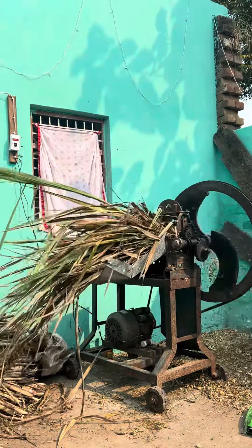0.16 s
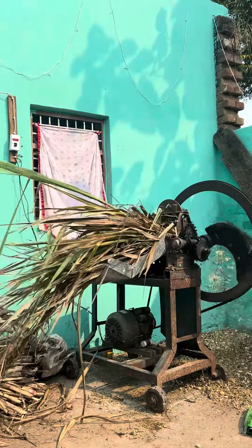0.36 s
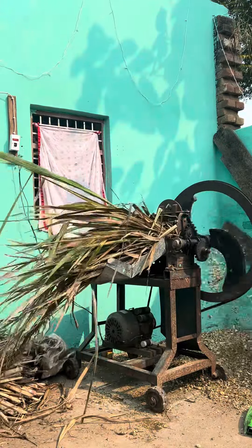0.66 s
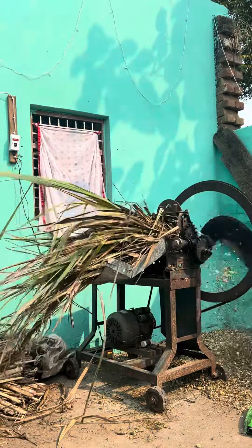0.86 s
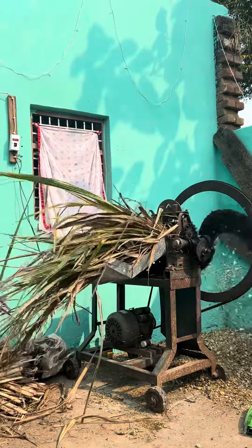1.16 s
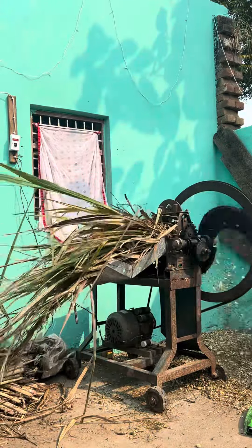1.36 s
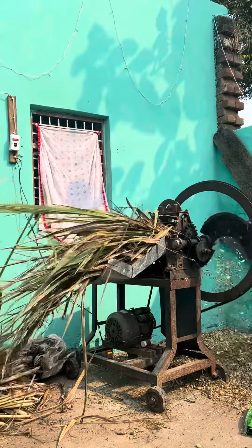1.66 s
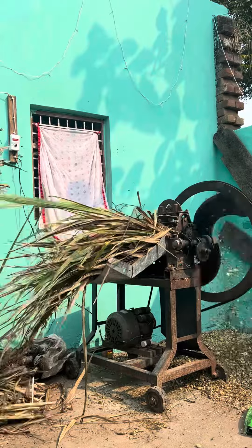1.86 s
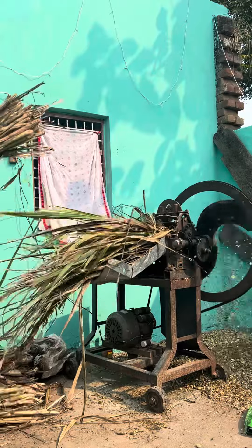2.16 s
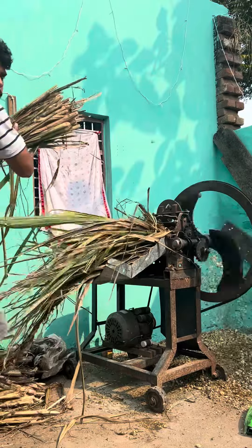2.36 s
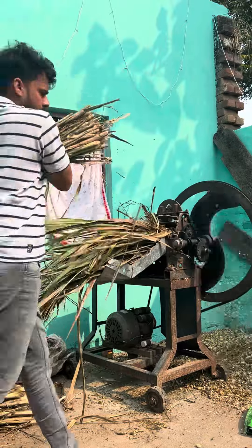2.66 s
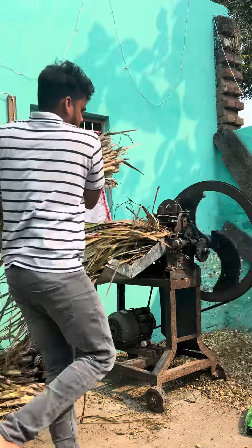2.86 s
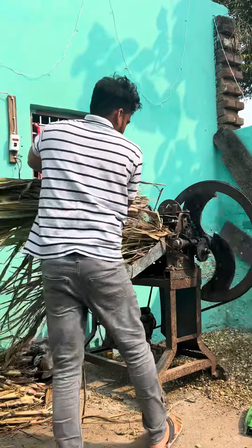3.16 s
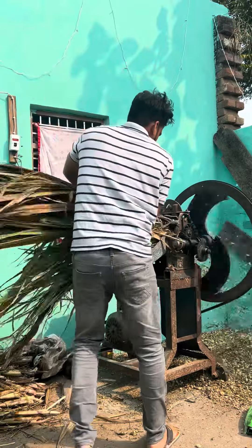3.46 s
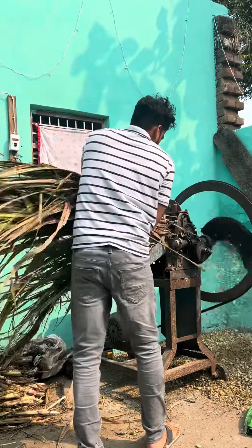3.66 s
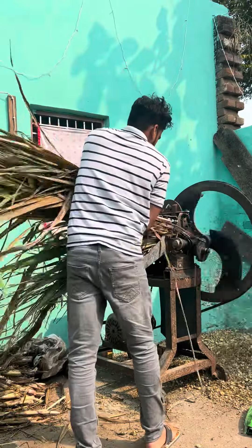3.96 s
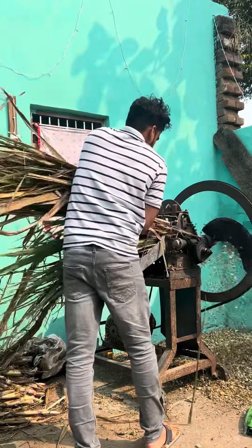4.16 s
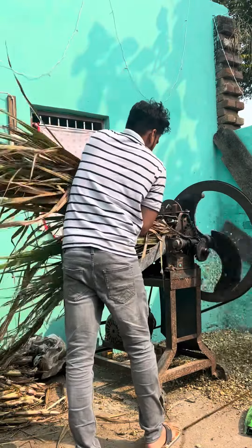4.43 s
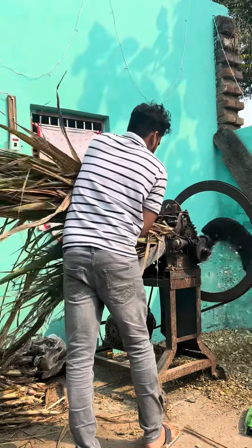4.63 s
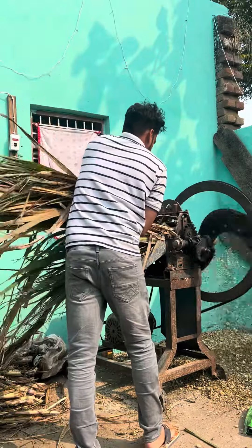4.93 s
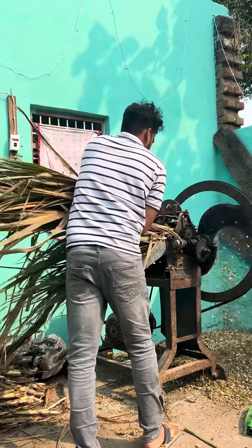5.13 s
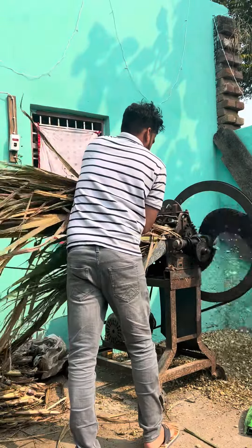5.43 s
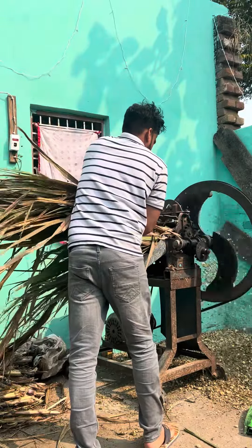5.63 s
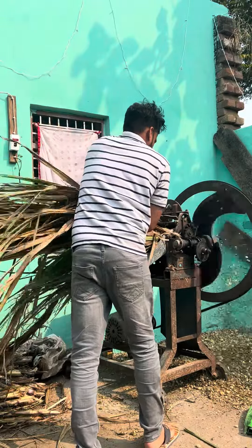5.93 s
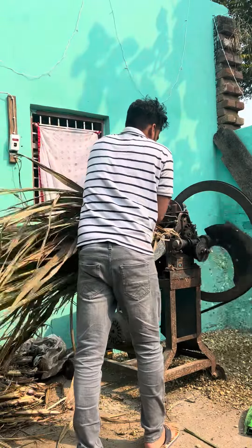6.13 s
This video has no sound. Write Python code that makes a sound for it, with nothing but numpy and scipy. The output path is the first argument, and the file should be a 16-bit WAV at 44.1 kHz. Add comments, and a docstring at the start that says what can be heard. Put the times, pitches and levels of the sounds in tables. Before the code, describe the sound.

Rapid rhythmic crunching of green stalks under two spinning flywheel blades, each cut a rasp and hollow knock, above motor hum and gear rattle.

```python
"""Crunching chops, a little over six a second, with ringing steel over a humming, rattling drive.
An electric chaff cutter cuts green stalks in a yard, in front of a house wall.
Two flywheel blades take turns: each shears leaves, crunches the bundle and knocks on hollow stalks.
Cuts are shaped bursts of random clicks, filtered; steel is resonances, motor and drive are wavering sines."""
import sys
import numpy as np
from scipy import signal
from scipy.fft import rfft, irfft
from scipy.io import wavfile
from scipy.ndimage import uniform_filter1d

SR = 44100
rng = np.random.default_rng(int(sys.argv[2]) if len(sys.argv) > 2 else 0)


def to_wav(s):
    """Save 16-bit WAV."""
    ch = np.atleast_2d(s).T  # columns
    pcm = np.round(np.clip(ch, -1, 1) * 32767)  # PCM
    wavfile.write(sys.argv[1], SR, pcm.astype(np.int16))


N = 277389
TIME = np.arange(N) / SR

# fullness of the leafy bundle in the mouth: t/s, relative level/dB
BUNDLE_FULLNESS = [(0, -2), (1.1, -0.5), (1.5, -2.5), (3.2, -4.0), (4.3, -5.5), (5.0, -6.0), (6.3, -7.5)]
HOLD_S_PER_DB = .0014  # a thinner bundle lets the blade out sooner


def crackle(full_db=-17.0, db_per_bundle_db=0.31, exit_db=-21.5):
    """The bundle packs and crunches against the plate; the last fibres tear as the blade leaves."""
    cuts = cut_times()
    bundle_db = at(BUNDLE_FULLNESS, cuts)
    force = strokes(cuts, full_db + db_per_bundle_db * bundle_db,
                    start_s=-.016, attack_s=.035, hold_s=.037, release_s=.033)
    exits = cuts + HOLD_S_PER_DB * bundle_db / 2
    tear = strokes(exits, exit_db + bundle_db / 2,
                   start_s=.027, attack_s=.016, hold_s=.0049, release_s=.024)
    return np.hypot(force, tear) * fibres(spread_db=2.5, clumps_db=1.04)


def thud(level_db=-17.4, jolt_db=1.42, stalk_hz=790, spread_octaves=.2):
    """Hollow stalks give way against the shear plate with a knock and shake the housing."""
    # hard stalk met by the blades: t/s, relative level/dB
    hard_stalk = [(0, -.5), (.85, -.5), (1.15, -2), (1.95, .5), (2.73, 0), (3.5, -3), (4.3, -4),
                  (4.45, -.7), (5.08, -2.5), (5.4, -4), (6.3, -5)]
    # direct thud spectrum: f/Hz, relative density/dB per Hz
    thud_spectrum = [(60, -17.5), (200, -22), (380, -19.5), (500, -3.5), (650, -6.5), (760, -1.5),
                     (940, -5.5), (1150, -9), (1500, -15), (2400, -23.5), (6000, -41.5)]
    # modes of cutting mouth and housing: f/Hz, width/Hz, relative level/dB
    housing_modes = [(555, 125, -7), (696, 15, -4.5), (753, 29, 6), (867, 44, -6.5), (1018, 56, 5),
                     (1406, 14, 4.5), (1580, 81, -7), (1790, 96, -5)]
    cuts = cut_times()
    force = strokes(cuts, level_db + at(hard_stalk, cuts),
                    start_s=-.0057, attack_s=.041, hold_s=.013, release_s=.035)
    force = force * amp(jolt_db * drift(rate_hz=40))  # jerks from stalk to stalk
    blows = clicks(per_s=2500, spread_db=2)
    local_power = abs(uniform_filter1d(blows ** 2, size=450))
    blows = force * blows / np.sqrt(local_power + 1e-2)  # blade shares its force among them

    housing = sum(amp(db) * resonate(blows, hz, width_hz) for hz, width_hz, db in housing_modes)
    # two stalk pitches a cut
    pitches_hz = stalk_hz * 2 ** (spread_octaves * rng.standard_normal((len(cuts), 2)))
    pitch_times = cuts[:, None] + [-.004, .008]
    pitch_hz = np.interp(TIME, pitch_times.ravel(), pitches_hz.ravel())
    stalks = resonate(blows, pitch_hz, width_hz=150)
    stalks = resonate(stalks, pitch_hz, width_hz=150)
    return amp(-4.5) * colour(blows, thud_spectrum) + amp(10) * housing + amp(14) * stalks


def leaves(full_db=-19.0, lead_s=.0019):
    """The blade shears the outer leaves first: a sudden, thin rasp."""
    cuts = cut_times()
    # one blade meets the leaves early, the other as much late
    touches = cuts - lead_s * (-1) ** np.arange(len(cuts))
    force = strokes(touches, full_db + at(BUNDLE_FULLNESS, cuts),
                    start_s=-.049, attack_s=.0135, hold_s=.021, release_s=.022)
    return force * fibres(spread_db=1.5, clumps_db=0.5)


def snaps():
    """Stalks crack in the feed rollers, a few ms each; flying chaff patters on the frame."""
    # single stalks snapping: t/s, relative level/dB
    snap_events = [(1.219, -27), (2.659, -29), (2.957, -28), (3.563, -35), (4.182, -28), (4.969, -32),
                   (5.884, -29)]
    burst = sum(stroke(s, db + 2.5, attack_s=.0005, hold_s=.0005, release_s=.005)
                for s, db in snap_events)
    patter = clicks(per_s=90, spread_db=4)
    return burst * rng.standard_normal(N) + amp(-44.5) * patter


def steel_ring(cutting):
    """Cutting noise excites decaying modes of the blades and flywheel."""
    # blade and flywheel modes: f/Hz, t60/s, relative level/dB
    steel_modes = [(1068, 0.23, -8), (1181, 0.39, -6), (2000, .2, -16), (2520, 0.22, -41),
                   (2775, 0.13, -18), (3210, 0.04, -16), (4680, 0.025, -9.5), (5940, .06, -19)]
    # how freely the steel rings: t/s, relative level/dB
    ring_level = [(0, -30.5), (1.3, -38.5), (2.5, -35), (3.2, -40), (4.5, -34), (6.3, -41)]
    ring = 0
    for hz, t60_s, db in steel_modes:
        width_hz = np.log(1000) / np.pi / t60_s
        ring = ring + amp(db) * unit(resonate(cutting, hz, width_hz))
    return amp(at(ring_level)) * unit(ring)


def blade_graze(gain_db=6.5):
    """One blade grazes the shear plate once a turn and sings as a wavering sine."""
    # how hard it grazes: t/s, relative level/dB
    graze_level = [(0, -31.5), (.85, -30), (1.8, -31.5), (2.45, -33), (2.75, -45), (6.3, -41)]
    turns = cut_times()[1::2]
    singing = strokes(turns, gain_db + at(graze_level, turns),
                      start_s=.023, attack_s=.04, hold_s=.035, release_s=.078)
    return singing * tone(hz=1072, waver_hz=5.02)


def gear_rattle(full_db=-33.8, db_per_bundle_db=0.4):
    """Feed gear teeth strike in random clicks, louder under a full bundle."""
    # rattle spectrum: f/Hz, relative density/dB per Hz
    gear_spectrum = [(20, -29), (42, -20), (80, -9.5), (130, -3), (180, 2.5), (290, -1), (400, 0.5),
                     (600, -5.5), (1450, -5.5), (1750, -22.5), (2050, -7), (2400, -21), (5000, -20),
                     (15000, -27.5)]
    teeth = clicks(per_s=1800, spread_db=2.0) * amp(2 * drift(rate_hz=125))
    level_db = full_db + db_per_bundle_db * at(BUNDLE_FULLNESS)
    return amp(level_db) * unit(colour(teeth, gear_spectrum))


def gear_whine():
    """Feed gears mesh in a whine of wavering pitch and strength."""
    # whine: t/s, level/dB
    whine_level = [(0, -46), (1.3, -39.5), (2.4, -39), (3.5, -54), (4.4, -47), (6.3, -44)]
    mesh = amp(3 * drift(rate_hz=35)) * tone(hz=1178, waver_hz=8)
    return amp(at(whine_level)) * mesh


def motor_hum():
    """Motor and drive hum as a few wavering sines that slowly fade together."""
    # hum partials: f/Hz, relative level/dB, rms waver/Hz
    hum_partials = [(99.8, -44, 0.35), (191, -45, 1.4), (217.6, -50, 0.85), (245.8, -47.5, 2.36),
                    (352.3, -49.5, 1.62)]
    # fade of the hum: t/s, relative level/dB
    hum_fade = [(0, 1.5), (1.2, 0.5), (2.6, 0), (3.6, -1), (4.7, -3.5), (6.3, -5.5)]
    hum = sum(amp(db + 1.6 * drift(rate_hz=16)) * tone(hz, waver_hz)
              for hz, db, waver_hz in hum_partials)
    return amp(at(hum_fade)) * hum


def belt_moan():
    """The belt moans on one wavering pitch."""
    # moan: t/s, relative level/dB
    belt_level = [(0, -34.5), (.2, -32.5), (.5, -36.5), (1.7, -43.5), (4, -45.5), (5.8, -50), (6.25, -39)]
    return amp(at(belt_level) - 4) * tone(hz=164.3, waver_hz=3.34)


def frame_drone(throb_db=4.5, throb_lead_s=0.075):
    """The frame drones on one low pitch, throbbing once per blade pass."""
    # drone: t/s, relative level/dB
    drone_level = [(0, -45.5), (2.15, -48), (2.4, -43.5), (4.1, -39.5), (5.1, -50), (6.3, -46.5)]
    cuts = cut_times()
    passes = np.interp(TIME + throb_lead_s, cuts, np.arange(len(cuts)))
    throb = amp(throb_db * np.cos(2 * np.pi * passes))
    return amp(at(drone_level) - 3.0) * unit(throb * tone(hz=63.5, waver_hz=3.4))


def yard(x, direct_db=-3.0, walls_db=-9, tail_db=-13, t60_s=0.28, count=4):
    """Ground and wall answer at once, a short tail follows; the turning wheel keeps changing the paths."""
    t = TIME[:SR // 3]
    out = amp(direct_db) * x
    shares = np.array([drift(rate_hz=11.1) for _ in range(count)])
    for share in shares / np.linalg.norm(shares, axis=0):
        sign, chance = rng.choice([-1, 1], len(t)), rng.random(len(t))
        early = sign * (chance < 1200 / SR) * (t > .002) * amp(-60 * t / 0.03)
        late = sign * (chance > 1 - 4000 / SR) * (t > .014) * amp(-60 * t / t60_s)
        echo = amp(walls_db) * early / np.linalg.norm(early)
        echo = echo + amp(tail_db) * late / np.linalg.norm(late)
        out = out + signal.oaconvolve(x * share, echo)[:N]
    return out


def ports(x, direct_share=0.56, size=256):
    """Two close microphone ports hear a phase offset; scattered sound blurs their difference."""
    # interport phase: f/Hz, left lead/rad
    port_phase = [(90, 0), (330, -.45), (600, -1), (1200, -.7), (1600, 0), (2650, 1.9), (3050, .9),
                  (4600, 1), (5500, 3.14), (7400, 6.25), (9900, 9.4), (10950, 10.2), (12300, 12.55),
                  (15000, 15.7)]
    # interport balance: f/Hz, left minus right/dB
    port_balance = [(80, 0), (450, 3), (850, 3.6), (1600, .3), (2700, -2.2), (3900, -2.4), (5000, 1.4),
                    (5500, 0)]
    frames = signal.stft(x, nperseg=size)[2]
    random_phase = np.exp(2j * np.pi * rng.random(frames.shape))
    scatter = signal.istft(frames * random_phase, nperseg=size)[1][:N]
    scatter = np.std(x) * unit(scatter)
    blurred = direct_share * x + np.sqrt(1 - direct_share ** 2) * scatter

    hz = np.fft.rfftfreq(N, 1 / SR)
    half_phase = read(port_phase, hz) / 2
    mid = np.cos(half_phase) * rfft(x)
    side = 1j * np.sin(half_phase) * rfft(blurred)
    lean = amp(read(port_balance, hz) / 2)
    return irfft(np.array([(mid + side) * lean, (mid - side) / lean]), N)


def cut_times(count=41, first_s=.0355, first_gap_s=.15995, gap_shrink_s=.000145):
    """Mid stroke of every blade pass; the flywheel gathers speed, so each gap is a little shorter."""
    k = np.arange(count)
    return first_s + k * first_gap_s - gap_shrink_s * k * (k - 1) / 2


def strokes(times, levels_db, start_s, attack_s, hold_s, release_s, uneven_db=0.84, uneven_s=.0016):
    """One stroke per blade pass, randomly uneven in level and timing, shorter in a thin bundle."""
    holds_s = np.maximum(hold_s + HOLD_S_PER_DB * at(BUNDLE_FULLNESS, times), 0)
    chance = rng.standard_normal((len(times), 3))
    out = np.zeros(N)
    for s, db, held_s, (hard, shift, longer) in zip(times, levels_db, holds_s, chance):
        out += stroke(s + start_s + uneven_s * shift, db + uneven_db * hard,
                      attack_s, held_s + uneven_s * longer, release_s)
    return out


def stroke(s, db, attack_s, hold_s, release_s, flank_db=19.5, flank_bend=1.49, sag_db_per_s=37):
    """Gain that swells up to time s, sags while the blade gets through and dies away."""
    out = np.zeros(N)
    near = slice(max(round((s - .15) * SR), 0), round((s + .2) * SR))
    after_s = TIME[near] - s
    # distance outside the hold, in attacks or releases
    away = np.maximum(-after_s / attack_s, 0) + np.maximum((after_s - hold_s) / release_s, 0)
    sag_db = sag_db_per_s * np.clip(after_s, 0, max(hold_s, 0))
    out[near] = amp(db - sag_db - flank_db * away ** flank_bend)
    return out


def fibres(spread_db, clumps_db):
    """Countless small breaks, in clumps."""
    return unit(clicks(per_s=7000, spread_db=spread_db) * amp(clumps_db * drift(rate_hz=180)))


def mottle(x, depth_db=4, size=512):
    """Breaking stalks vary in colour: narrow random peaks that last for part of a stroke."""
    overlap = size * 3 // 4
    z = signal.stft(x, nperseg=size, noverlap=overlap)[2]
    patches = uniform_filter1d(rng.standard_normal(z.shape), size=5, axis=1)  # over time
    patches = unit(uniform_filter1d(patches, size=2, axis=0))  # over frequency
    out = signal.istft(z * amp(depth_db * patches), nperseg=size, noverlap=overlap)[1][:N]
    return unit(out) * np.std(x)


def clicks(per_s, spread_db):
    """Random clicks of either sign, a few much larger than the rest, rms 1."""
    size = amp(spread_db * np.minimum(rng.exponential(1, N), np.pi))
    return unit(size * rng.choice([-1, 1], N) * (rng.random(N) < per_s / SR))


def tone(hz, waver_hz):
    """Sine of rms 1 whose pitch wavers by waver_hz rms."""
    return np.sqrt(2) * np.sin(2 * np.pi * np.cumsum(hz + waver_hz * drift(rate_hz=6.83)) / SR)


def resonate(x, hz, width_hz):
    """One resonance of peak gain about 1: a low-pass around a turning carrier; hz may be a curve."""
    turn = np.exp(2j * np.pi * np.cumsum(hz * np.ones(N)) / SR)
    r = np.exp(-np.pi * width_hz / SR)
    return 2 * (turn * signal.lfilter([1 - r], [1, -r], x / turn + 1e-18)).real


def colour(x, points, size=4096):
    """Minimum-phase filter of energy 1 with the given spectrum."""
    log_mag = np.log(amp(read(points, np.fft.rfftfreq(size, 1 / SR))))
    log_gain = np.conj(signal.hilbert(np.r_[log_mag, log_mag[-2:0:-1]]))
    taps = np.fft.ifft(np.exp(log_gain)).real[:size // 2]
    return signal.oaconvolve(x, taps / np.linalg.norm(taps))[:N]


def drift(rate_hz):
    """Smooth random curve of rms 1, mostly slower than rate_hz."""
    hz = np.fft.rfftfreq(N, 1 / SR)
    return unit(irfft(rfft(rng.standard_normal(N)) * np.exp(-(hz / rate_hz) ** 2), N))


def read(points, hz):
    """Joins (Hz, value) points on a log-frequency axis."""
    f, value = np.transpose(points)
    return np.interp(np.log(hz + 1), np.log(f), value)


def at(curve, s=TIME):
    """Value of a (s, value) curve at the given times."""
    return np.interp(s, *np.transpose(curve))


def amp(db):
    """Decibels to gain."""
    return 10 ** (np.asarray(db) / 20)


def unit(x):
    """Scales to rms 1."""
    return x / np.sqrt(np.mean(x ** 2) + 1e-20)


def scene():
    """The cutter in its yard: chops echo, steel and drive are heard directly."""
    # spectra of leaves and snaps, and of the crunch: f/Hz, relative density/dB per Hz
    leaf_spectrum = [(60, -45), (300, -2.5), (800, 4.5), (1700, 0.5), (3000, -2.5), (4700, -2),
                     (6000, -4.5), (8200, -3.5), (11500, -8), (15700, -3)]
    crunch_spectrum = [(25, -34), (200, -8.5), (600, 1.5), (1100, 2.5), (1900, -1), (2450, -1.5),
                       (3100, -1), (4700, -1.5), (6000, -4), (8200, -6.5), (10000, -9.5), (11500, -10),
                       (15700, -11.5)]
    rasp, crunch = leaves(), crackle()
    chop = amp(1) * colour(rasp + snaps(), leaf_spectrum)
    chop = chop + amp(0.5) * colour(mottle(crunch), crunch_spectrum) + thud()
    steel = steel_ring(rasp + crunch) + blade_graze()
    drive = gear_rattle() + gear_whine() + motor_hum() + belt_moan() + frame_drone()
    return ports(yard(chop) + amp(-3) * steel + drive)


def record(dry, low_cut_hz=42, edge_hz=15700):
    """Low cut and band limit."""
    low_cut = signal.butter(3, low_cut_hz, "highpass", fs=SR, output="sos")
    thinned = signal.sosfilt(low_cut, dry)
    band_limit = signal.firwin(801, edge_hz, window=("kaiser", 9), fs=SR)
    return signal.oaconvolve(thinned, band_limit[None], "same")


dry = scene()
out = record(dry)
to_wav(out)
```